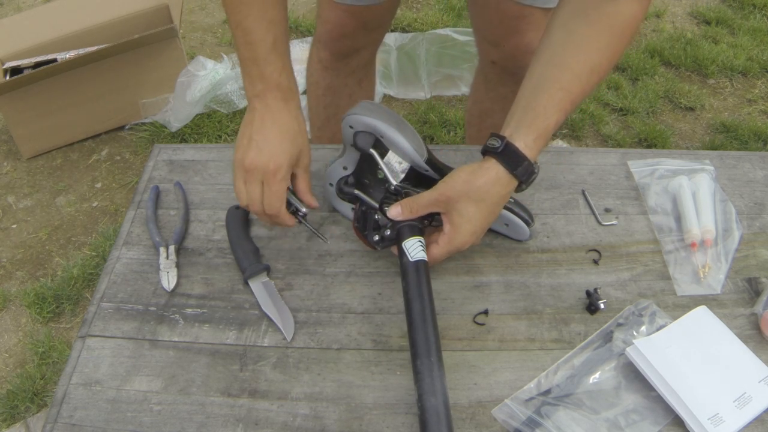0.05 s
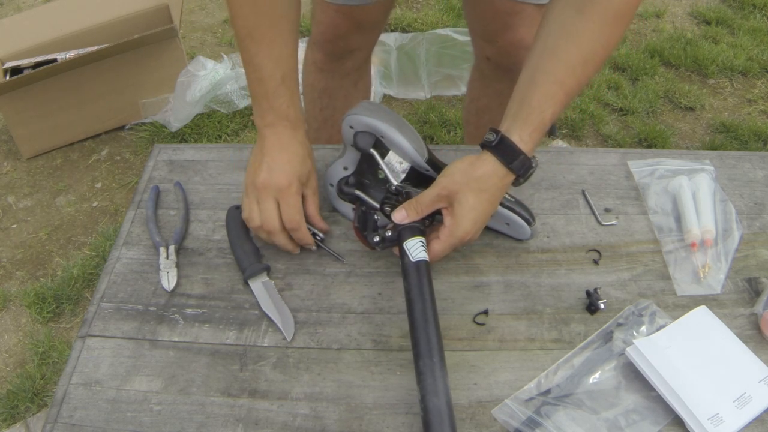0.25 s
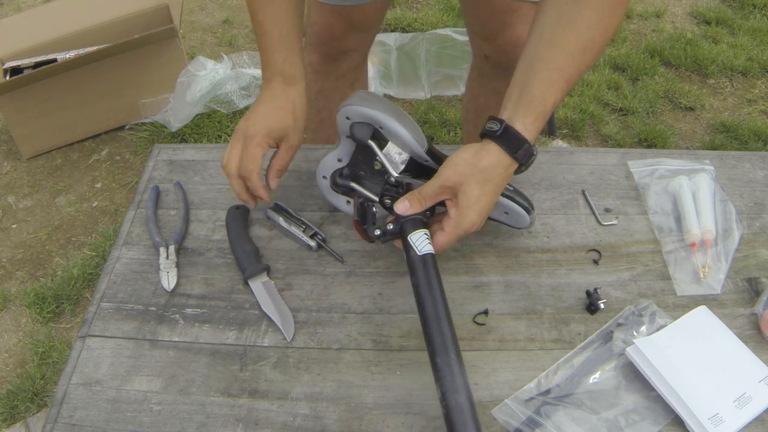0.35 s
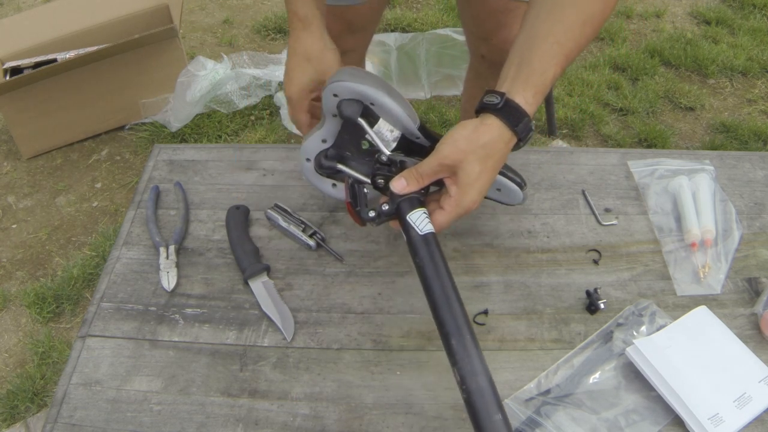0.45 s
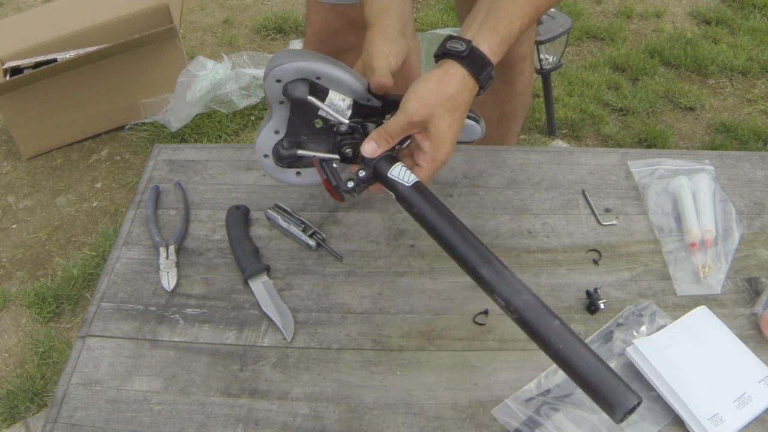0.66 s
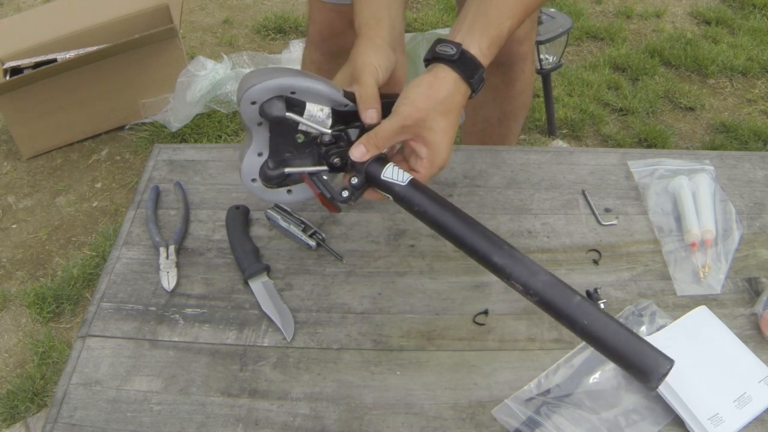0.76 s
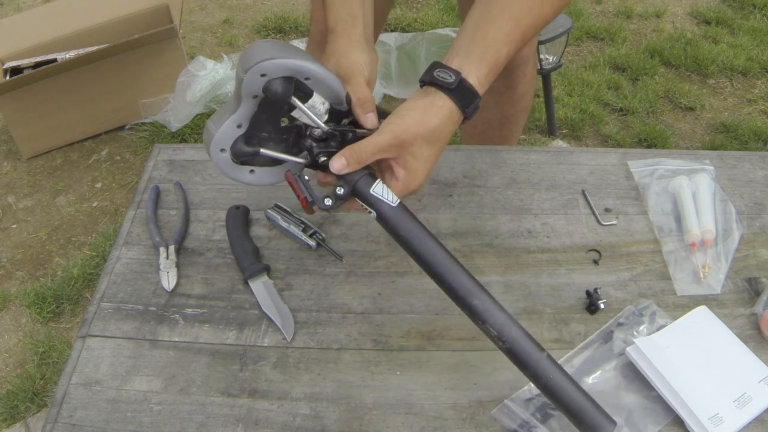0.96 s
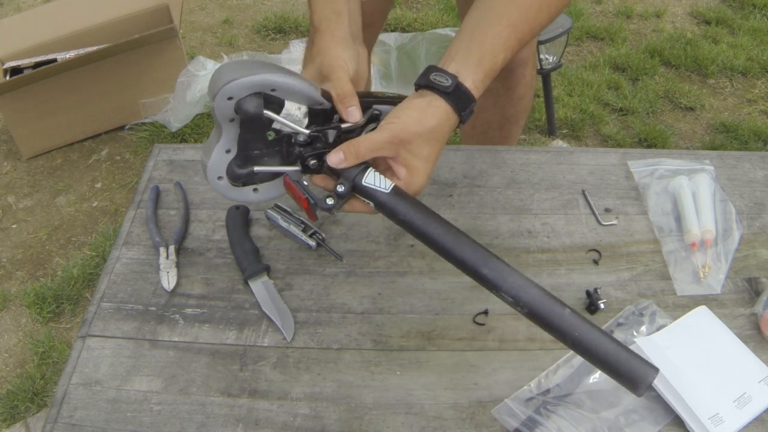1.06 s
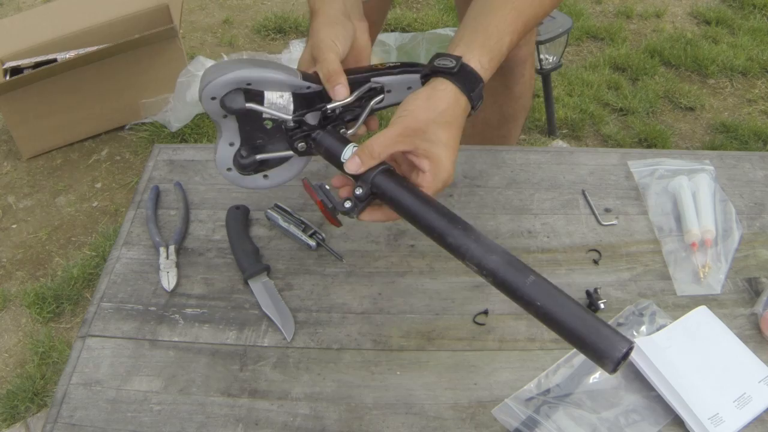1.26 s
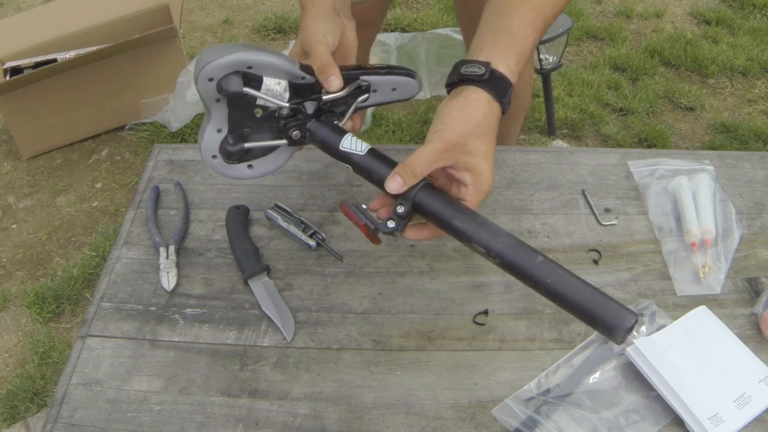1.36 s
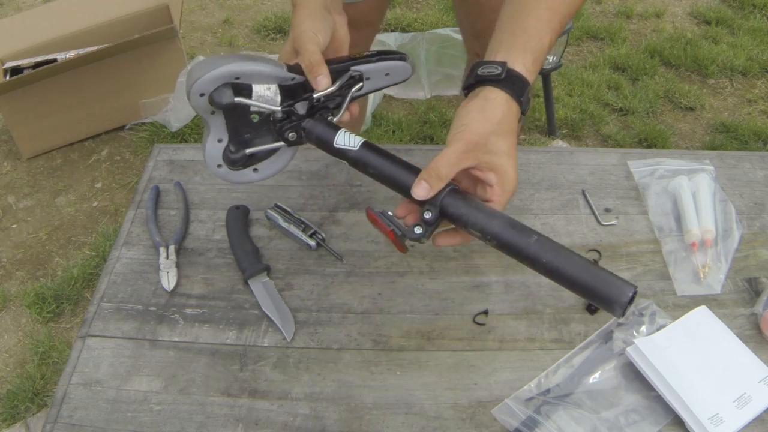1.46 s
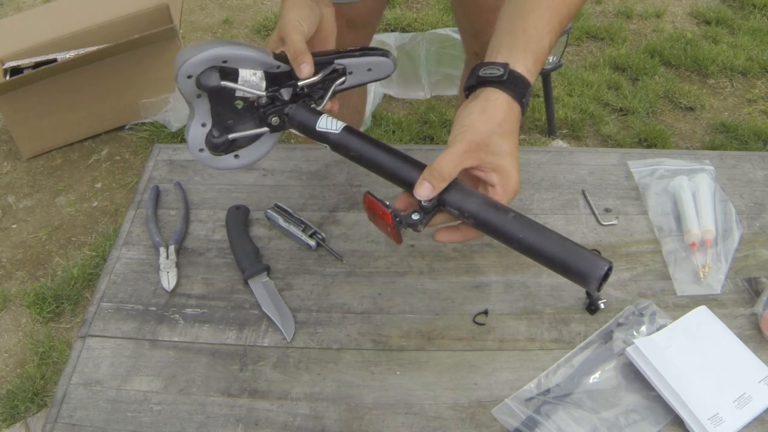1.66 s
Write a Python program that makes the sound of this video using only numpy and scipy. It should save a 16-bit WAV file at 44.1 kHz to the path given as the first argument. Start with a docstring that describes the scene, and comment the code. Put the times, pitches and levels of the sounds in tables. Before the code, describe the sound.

Close and dry in open air: dull, woody knocks and judders as a wheel unit settles on a tabletop, a sharp metallic click with a faint twang, then a thin, wavering, jerky squeak of a clamp sliding on a tube.

```python
"""A scooter's wheel unit tips over on a wooden garden table: it knocks, clatters and judders to rest.
Each knock rings the table's damped modes, a dense noise ring of the boards and a chatter of loose parts.
A metal clamp on its tube clicks open with a twang, then slides along with a thin, wavering scrape:
friction noise and an unsteady squeak, with bumps on the hollow tube and shifting hands.
Close and dry, in quiet open air with a little wind rumble on the microphone."""
import sys
import numpy as np
from scipy import signal
from scipy.fft import rfft, irfft, next_fast_len
from scipy.io import wavfile
from scipy.ndimage import uniform_filter1d, map_coordinates

SR = 44100
rng = np.random.default_rng(int(sys.argv[2]) if len(sys.argv) > 2 else 0)


def waveform_to_disk(signal):
    """Save audio, clipped to [-1, 1], as 16-bit WAV at the path in sys.argv[1]."""
    frames = np.transpose(np.atleast_2d(signal))
    scaled = np.clip(frames, -1, 1) * 32767
    samples = np.round(scaled).astype(np.int16)
    wavfile.write(sys.argv[1], SR, samples)


N = 74970
BLOW_TIME = np.arange(int(0.4 * SR)) / SR  # time axis of one blow [s]
TABLE_LOW_HZ = 123  # the boards radiate little below this


def amp(db):
    """Decibels to gain."""
    return 10 ** (np.asarray(db) / 20)


def unit(x):
    """Scale to rms 1."""
    return x / np.sqrt(np.mean(x ** 2) + 1e-20)


def along(points, hz):
    """Interpolate (frequency [Hz], value) points on a log frequency axis."""
    f, v = np.transpose(points)
    return np.interp(np.log(hz + 1), np.log(f + 1), v)


def curve(rows):
    """Interpolate (time [s], value) points to one value per sample."""
    return np.interp(np.arange(N) / SR, *np.transpose(rows))


def gesture(rows, fade_s=0.039):
    """Gain of a (time [s], level [dB]) curve, fading out beyond its ends."""
    start, end = rows[0][0], rows[-1][0]
    fade = curve([(start - fade_s, 0), (start, 1), (end, 1), (end + fade_s, 0)])
    return amp(curve(rows)) * fade


def wobble(rate):
    """A smooth random curve through normally distributed knots, rate of them a second."""
    knots = rng.standard_normal(N // 8)
    return map_coordinates(knots, [np.arange(N) * rate / SR], mode="wrap")


def filtered(x, response):
    """Multiply the spectrum of x by a response of frequency."""
    m = next_fast_len(len(x) + 8192)  # padded against wrap-around
    return irfft(rfft(x, m) * response(np.fft.rfftfreq(m, 1 / SR)), m)[:len(x)]


def coloured(x, spectrum):
    """Shape x by (frequency [Hz], level [dB]) points and scale it to rms 1."""
    return unit(filtered(x, lambda hz: amp(along(spectrum, hz))))


def noise(spectrum, size):
    """Coloured noise of rms 1."""
    return coloured(rng.standard_normal(size), spectrum)


def ticks(per_s, spectrum, size):
    """Tiny coloured contacts at random moments, rms 1."""
    hits = (rng.random(size) < per_s / SR) * rng.standard_normal(size)
    return coloured(hits, spectrum)


def patchy(x, depth_db):
    """Give a noise random patches of gain in time and frequency, rms 1."""
    z = signal.stft(x, nperseg=512)[2]
    field = rng.standard_normal(z.shape)
    field = uniform_filter1d(field, size=4, axis=0)
    field = uniform_filter1d(field, size=6, axis=1)
    return unit(signal.istft(z * amp(depth_db * unit(field)))[1][:N])


def rubbed(peaks):
    """Friction noise through (centre [Hz], width [Hz], level [dB]) resonances, rms 1."""
    def body(f):
        total = 0
        for k, (centre, width, db) in enumerate(peaks):
            damping = 1j * f * width
            # neighbouring resonances have opposite sign
            total = total + (-1) ** k * amp(db) * damping / (centre * centre - f * f + damping)
        return total
    return unit(filtered(rng.standard_normal(N), body))


def dying(t, t60):
    """Exponential decay by 60 dB in t60 seconds."""
    return np.exp(-np.log(1000) * t / t60)


def ring(modes, t, scatter_db):
    """Sum damped sine modes, their levels scattered at random by scatter_db at every blow."""
    total = np.zeros(len(t))
    for hz, db, t60 in modes:
        level = amp(db + scatter_db * rng.standard_normal())
        rise = 1 - np.exp(-t * hz / 0.4)  # time constant of 0.4 cycles
        total += level * rise * dying(t, t60) * np.sin(2 * np.pi * hz * t)
    return total


def add(out, s, db, top_hz, sound):
    """Mix in a blow at s seconds; a softer contact, with a lower top_hz, takes away its treble."""
    lowpass = signal.butter(4, min(top_hz, SR / 2 - 1), fs=SR, output="sos")
    soft = signal.sosfilt(lowpass, sound)
    room = out[round(s * SR):][:len(soft)]
    room += amp(db) * soft[:len(room)]


def above_table_low(x, order):
    """Cut the lows that the boards hardly radiate."""
    return signal.sosfilt(signal.butter(order, TABLE_LOW_HZ, "highpass", fs=SR, output="sos"), x)


def knocks():
    """Each contact rings the table's main modes, stirs the boards and shakes loose parts."""
    # wheel unit on the table: (time [s], relative level [dB], hardness as the contact's top [Hz])
    contacts = [(0.181, -35, 222), (0.194, -39, 299), (0.2238, -30, 1900), (0.2295, -15, 870),
                (0.2404, -9, 232), (0.2617, -16.5, 296), (0.2694, -12.5, 204), (.2944, -5.5, 3230),
                (0.3086, -8.5, 430), (0.3154, -21.5, 890), (0.338, -24.5, 590), (0.3703, -14.5, 336),
                (0.381, -34, 750), (0.398, -19.5, 380), (.414, -14, 218), (0.4594, -23.5, 473),
                (.490, -23.5, 350), (0.522, -24.5, 306), (.549, -30, 350), (0.586, -36.5, 280),
                (0.614, -38, 234), (0.652, -32, 192)]
    # boards and frame, before the tyre's damping: (mode [Hz], mean level [dB], t60 [s])
    table_modes = [(120.5, -35, 0.51), (150.7, -19.5, 0.11), (180.5, -30, 0.23), (220, -21.5, 0.25),
                   (274.8, -3.5, 0.044), (317.7, -7.5, 0.033), (384.7, -7, 0.041), (520.7, -9, 0.04),
                   (608, -19.5, 0.1), (652, -7.5, 0.068), (705.5, -10, 0.06), (760, -12, 0.025),
                   (892, -23.5, 0.093), (945, -11.5, 0.053), (1004, -14.5, 0.077), (1186, -32, 0.11),
                   (1438, -15.5, 0.042), (1658, -21.5, 0.055), (1744, -30, 0.093), (2387, -30, 0.05),
                   (2630, -32.5, 0.044), (3045, -29, .025), (3720, -34.5, 0.029)]
    # dense ring of the boards: (frequency [Hz], relative level [dB]), then (frequency [Hz], t60 [s])
    board_spectrum = [(60, -34), (130, -14.5), (300, 5), (1000, 2), (1250, -19), (1750, -0.5), (2050, -31),
                      (2800, -13.5), (3600, -6.5), (4300, -26.5), (10000, -16.5), (15000, -27)]
    board_t60 = [(150, 0.077), (600, 0.15), (1500, 0.11), (4000, 0.015), (10000, 0.021)]
    # loose parts: (frequency [Hz], relative level [dB])
    rattle_spectrum = [(500, -20.5), (1500, -11), (2100, -11), (3200, -13), (4500, -24.5), (12000, -24)]
    modes_db, boards_db, rattle_db = -2, -19, -41
    boards_rise_s = 0.00052  # the dense ring builds up after the blow
    rattle_t60_s, rattle_per_s = 0.14, 940
    damp_s_per_hz = 0.00046  # a soft contact lingers and damps the ring: t60 per Hz of hardness

    out, t = np.zeros(N), BLOW_TIME
    for s, db, top_hz in contacts:
        # each frequency of the dense ring dies at its own rate
        hz, frames, z = signal.stft(noise(board_spectrum, len(t)), SR, nperseg=256)
        decay = dying(frames, along(board_t60, hz)[:, None])
        boards = signal.istft(z * decay, SR)[1][:len(t)]
        boards = boards * (1 - np.exp(-t / boards_rise_s))
        chatter = ticks(rattle_per_s, rattle_spectrum, len(t))
        rattle = amp(rattle_db) * dying(t, rattle_t60_s) * chatter
        body = amp(modes_db) * ring(table_modes, t, scatter_db=2.5) + amp(boards_db) * boards
        add(out, s, db, top_hz, body * dying(t, damp_s_per_hz * top_hz) + rattle)
    return above_table_low(out, order=2)


def rolling():
    """The tyre rolls and scuffs over the boards: resonant friction noise, dulled by its soft contact."""
    # strength of the rolling: (time [s], relative level [dB])
    strength = [(.17, -63), (.20, -46.5), (.25, -44), (.31, -36.5), (.35, -40), (.385, -31), (.42, -34.5),
                (.445, -44), (.50, -47.5), (.56, -52), (.62, -54.5), (.72, -70)]
    # boards under the tyre: (centre [Hz], width [Hz], relative level [dB])
    resonances = [(164.4, 39, 2), (198, 34, -4), (243, 22, -10.5), (347, 127, -13), (622, 46, -18),
                  (870, 180, -26), (1680, 120, -34)]
    roll_db, soft_hz = -1.5, 1580  # level; frequency where the soft contact halves the amplitude
    rumble = above_table_low(rubbed(resonances), order=4)
    softened = filtered(rumble, lambda hz: 1 / (1 + (hz / soft_hz) ** 2))
    return amp(roll_db) * gesture(strength) * softened


def clicks():
    """Light metal contacts: a snap of noise with a faint tail, and a short ring of damped modes."""
    # light metal contacts, the wheel unit's clatter until 0.65 s, then the clamp:
    # (time [s], relative level [dB], hardness as the contact's top [Hz])
    contacts = [(0.224, -59, 5090), (0.2285, -48, 12630), (0.2305, -39, 2550), (.241, -44, 2830),
                (0.26, -52, 4200), (0.2965, -45, 11200), (0.315, -49.5, 5500), (0.392, -42.5, 1640),
                (0.562, -53, 2050), (0.649, -52, 2870), (0.7586, -53.5, 4950), (0.797, -46.5, 1730),
                (0.8835, -50, 4285), (0.888, -36, 12000), (0.8921, -37, 4240), (0.8941, -38, 2360),
                (0.91, -66, 5060), (.9205, -52, 3870), (0.9362, -43.5, 4630), (1.0884, -44.5, 1960),
                (1.244, -57, 12000), (1.357, -52, 9000), (1.46, -49, 8000)]
    # the metal parts: (mode [Hz], mean level [dB], t60 [s])
    metal_modes = [(740, -10, 0.08), (1164, -6.5, 0.051), (1597, 0, 0.026), (1770, 0.5, 0.025),
                   (1900, -3.5, 0.027), (2800, 2.5, 0.012), (2930, -2.5, 0.021), (3800, -8.5, 0.023),
                   (5200, -17, 0.0066)]
    # noise of the snap: (frequency [Hz], relative level [dB])
    snap_spectrum = [(300, -29.5), (650, 10.5), (1000, 7), (2000, 2.5), (4500, 5), (6500, -9), (10000, -13),
                     (15000, -36)]
    metal_db = -9.5
    snap_db, snap_t60_s = -5.5, 0.02
    tail_db, tail_t60_s = -25, 0.33

    out, t = np.zeros(N), BLOW_TIME
    snap_decay = amp(snap_db) * dying(t, snap_t60_s) + amp(tail_db) * dying(t, tail_t60_s)
    for s, db, top_hz in contacts:
        snap = noise(snap_spectrum, len(t)) * snap_decay
        metal = amp(metal_db) * ring(metal_modes, t, scatter_db=3.5)
        add(out, s, db, top_hz, metal + snap)
    return out


def twang():
    """The released lever rings as a decaying sine, its pitch settling as the tension goes."""
    start_s, level_db, t60_s = 0.894, -49, 0.2
    rest_hz, extra_hz, settle_s = 690, 110, 0.018  # starts at rest_hz + extra_hz
    t = np.maximum(np.arange(N) / SR - start_s, 0)
    hz = rest_hz + extra_hz * np.exp(-t / settle_s)
    phase = 2 * np.pi * np.cumsum(hz * (t > 0)) / SR
    return amp(level_db) * dying(t, t60_s) * np.sin(phase)


def friction():
    """The clamp slides in jerks: grainy hiss, the tube's resonances and single grains catching."""
    # strength of the rubbing: (time [s], relative level [dB])
    strength = [(0.986, -95), (1.012, -72.5), (1.09, -67), (1.096, -91), (1.14, -75), (1.18, -59),
                (1.285, -55.5), (1.336, -58), (1.352, -63.5), (1.36, -59.5), (1.38, -56.5), (1.394, -76),
                (1.408, -58), (1.428, -69.5), (1.45, -58), (1.478, -74.5), (1.518, -58), (1.535, -86)]
    # hiss of the contact: (frequency [Hz], relative level [dB])
    hiss_spectrum = [(300, -4), (900, 4), (2000, 6.5), (2650, 2), (3150, -10), (3750, 4), (4700, 4.5),
                     (5200, -6), (5800, -3.5), (7200, -12.5), (8700, -10), (9400, -15), (10300, -11.5),
                     (12000, -24), (15000, -27)]
    # the tube: (centre [Hz], width [Hz], relative level [dB])
    tube_resonances = [(405, 24, -18), (584, 45, -3.5), (897, 61, 0), (3800, 200, -7), (5560, 89, -8.5),
                       (8700, 260, -15), (9790, 44, -8), (10750, 64, -21)]
    hiss_db, tube_db, grit_db = 2.5, -3.5, -3
    grain_db, grain_per_s, grit_per_s = 1.5, 300, 520
    grain = unit(amp(grain_db * wobble(grain_per_s)))
    grit = amp(grit_db) * ticks(grit_per_s, hiss_spectrum, N)
    # the hiss shifts in colour as the contact moves
    hiss = amp(hiss_db) * patchy(noise(hiss_spectrum, N), depth_db=3.5)
    tube = amp(tube_db) * rubbed(tube_resonances)
    return gesture(strength) * (grit + grain * (hiss + tube))


def squeak():
    """The sliding clamp squeaks: a jittered sine with a noisy skirt, its pitch following the hand."""
    # speed of the hand heard as pitch, before jitter: (time [s], pitch [Hz])
    pitch = [(1.15, 700), (1.175, 987), (1.193, 1490), (1.22, 1172), (1.243, 1041), (1.265, 1480),
             (1.288, 1826), (1.303, 1461), (1.316, 1769), (1.33, 997), (1.371, 911), (1.374, 1545),
             (1.385, 1310), (1.395, 868), (1.43, 971.5), (1.449, 1753), (1.474, 875), (1.50, 793)]
    # strength of the squeak: (time [s], relative level [dB])
    strength = [(1.15, -77), (1.175, -54), (1.20, -48), (1.23, -53.5), (1.288, -50), (1.304, -57),
                (1.318, -47.5), (1.328, -65), (1.352, -57), (1.364, -46.5), (1.379, -51.5), (1.392, -68),
                (1.403, -51.5), (1.428, -74), (1.444, -47.5), (1.454, -48), (1.474, -71), (1.488, -46),
                (1.502, -66), (1.522, -55), (1.535, -79)]
    squeak_db, flutter_db, jitter = -1.5, 3, 0.034  # jitter as a fraction of the pitch
    rasp_db, rasp_rate_hz = -17.5, 940
    hz = curve(pitch) * (1 + jitter * wobble(900))
    phase = 2 * np.pi * np.cumsum(hz) / SR
    skirt = wobble(rasp_rate_hz) * np.sin(phase) + wobble(rasp_rate_hz) * np.cos(phase)
    tone = np.sin(phase) + amp(rasp_db) * skirt
    fluttering = unit(tone * amp(flutter_db * wobble(250)))
    return amp(squeak_db) * gesture(strength) * fluttering


def bumps():
    """The sliding clamp catches and jolts the hollow tube, ringing its damped modes."""
    # clamp against tube: (time [s], relative level [dB], hardness as the contact's top [Hz])
    contacts = [(1.088, -47, 900), (1.319, -43.5, 800), (1.354, -45.5, 1110), (1.386, -51, 600),
                (1.46, -47, 890), (1.521, -44.5, 576)]
    # the hollow tube: (mode [Hz], relative level [dB], t60 [s])
    tube_modes = [(333, -2.5, 0.051), (397, -2.5, 0.075), (605, -13, .05), (900, 3.5, 0.03)]
    out = np.zeros(N)
    for s, db, top_hz in contacts:
        add(out, s, db, top_hz, ring(tube_modes, BLOW_TIME, scatter_db=0.0))
    return out


def handling():
    """Hands shift on the hollow tube: friction noise through its resonances."""
    # strength of the hands' rubbing: (time [s], relative level [dB])
    strength = [(.80, -86), (.84, -71), (.98, -74), (1.08, -64), (1.16, -64), (1.29, -84), (1.34, -64.5),
                (1.44, -66), (1.545, -70), (1.7, -70)]
    # tube under the hands: (centre [Hz], width [Hz], relative level [dB])
    resonances = [(206, 150, -8.5), (378, 66, 2), (605, 66, -5.5), (940, 100, -7.5), (1780, 170, -10.5)]
    return amp(5.5) * gesture(strength) * rubbed(resonances)


def garden():
    """Steady outdoor hush and a light wind on the microphone, both coloured noise."""
    # open air: (frequency [Hz], relative level [dB])
    air_spectrum = [(60, 1.5), (150, -0.5), (250, -8), (400, -6.5), (700, -12.5), (1200, -15),
                    (1900, -21.5), (2800, -13), (3800, -22), (5300, -23), (7500, -29.5), (12500, -35),
                    (15400, -51.5)]
    # wind at the microphone: (frequency [Hz], relative level [dB])
    wind_spectrum = [(10, -3), (33, 8.5), (48, -3), (62, -5), (85, -9.5), (130, -10.5), (250, -28),
                     (600, -48)]
    air_db, wind_db = -63.5, -56.5  # rms levels
    return amp(air_db) * noise(air_spectrum, N) + amp(wind_db) * noise(wind_spectrum, N)


def scene():
    """Everything, close and dry in the open air."""
    impacts = knocks() + rolling() + clicks()
    sliding = twang() + friction() + squeak() + bumps()
    return (impacts + sliding + handling() + garden())[None]


def record(dry):
    """The camera keeps nothing above its band limit."""
    top_hz = 15400
    return np.array([filtered(x, lambda hz: hz < top_hz) for x in dry])


dry = scene()
out = record(dry)
waveform_to_disk(out)
```